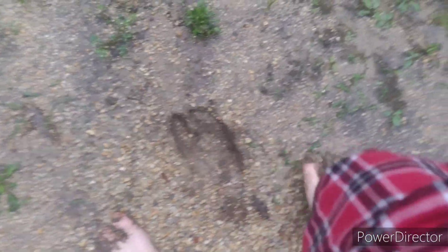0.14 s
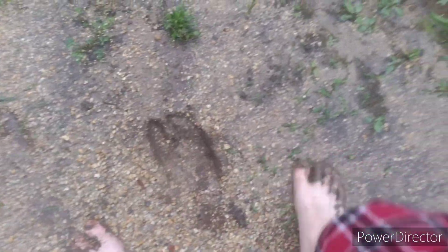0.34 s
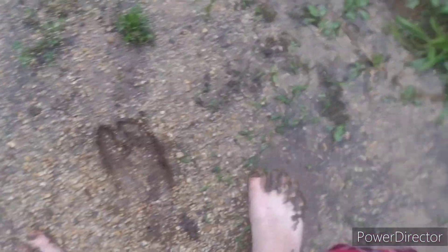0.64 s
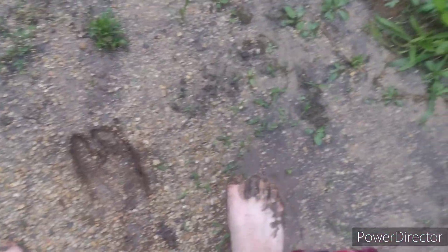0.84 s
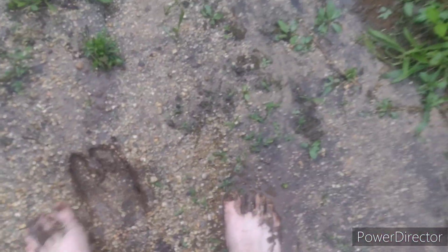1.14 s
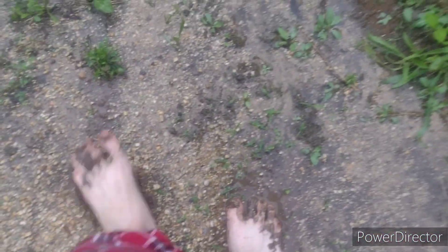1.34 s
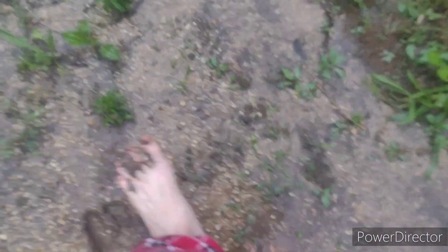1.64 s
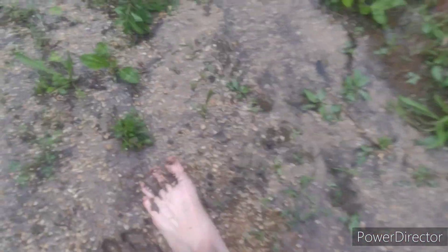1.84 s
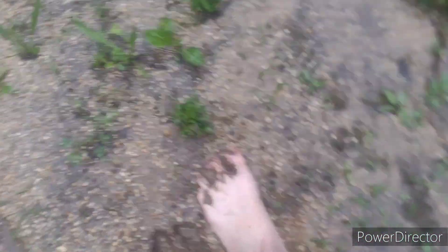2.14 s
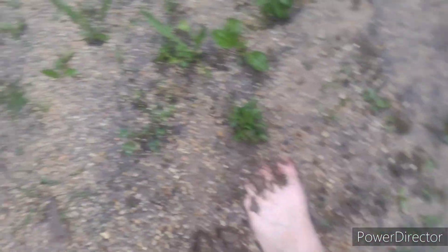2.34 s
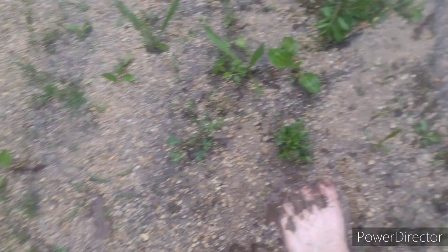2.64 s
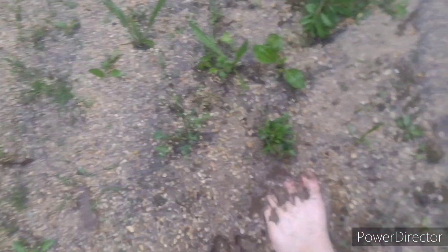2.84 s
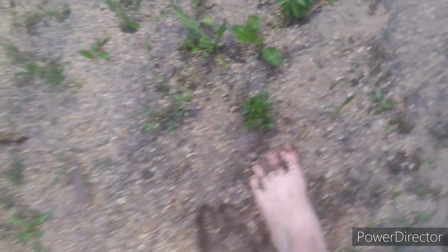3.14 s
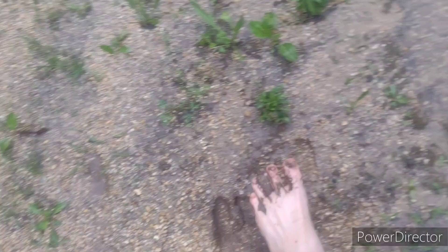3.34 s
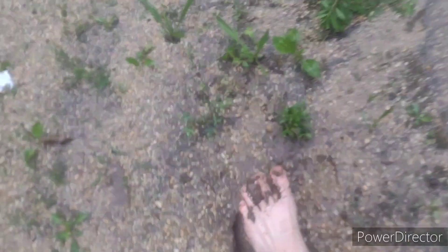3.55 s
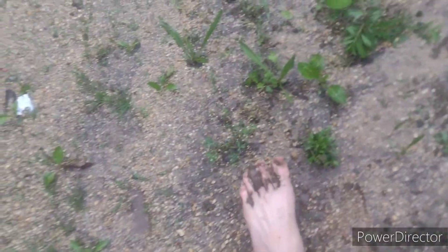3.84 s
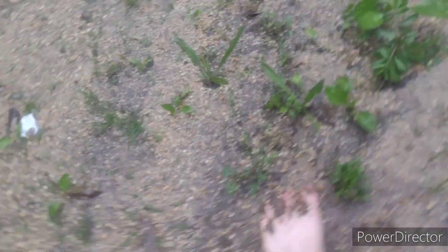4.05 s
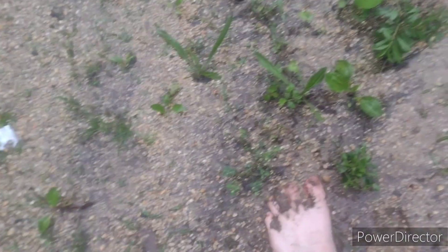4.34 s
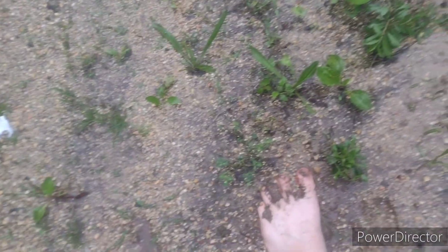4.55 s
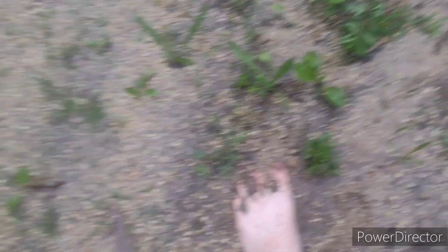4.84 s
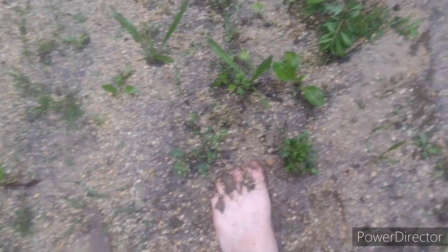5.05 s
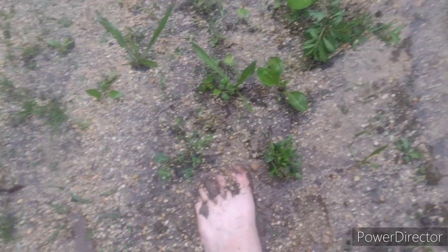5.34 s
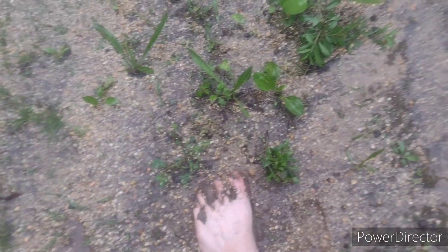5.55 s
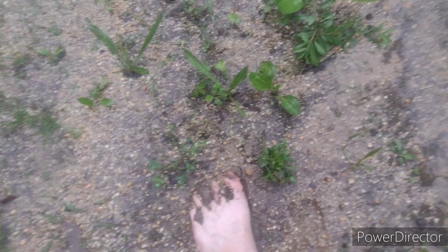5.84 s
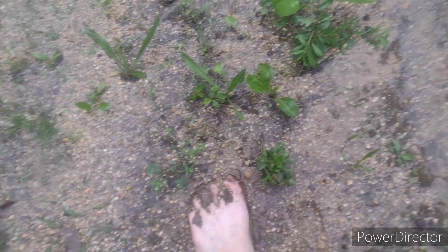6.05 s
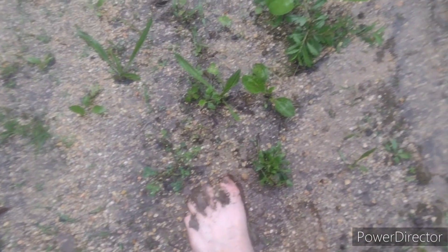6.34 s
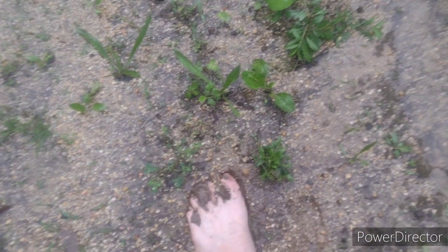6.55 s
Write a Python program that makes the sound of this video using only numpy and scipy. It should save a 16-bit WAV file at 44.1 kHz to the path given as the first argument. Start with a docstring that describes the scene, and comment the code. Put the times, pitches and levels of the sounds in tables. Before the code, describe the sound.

Slow bare footsteps on wet grit: hollow wet taps, crunchy cracks and tiny squelches in clusters, over a thin hiss of light rain.

```python
"""Barefoot on wet grit

Slow barefoot steps on wet, gritty ground in light rain, heard from a hand-held camera.
Short wet taps are swelling tones with noise bursts for crack and spray; squelches are tones alone.
A soft low rustle, crackle and scrape are coloured random impulses; rain is noise with patter, ticks are tiny
bursts. A faint drone of two wavering sines lies far off. The right microphone port is blocked: it gives only
a faint rumble, the rub of the grip and a little of the outside sound."""
import sys
import numpy as np
from scipy import signal
from scipy.fft import rfft, irfft, next_fast_len
from scipy.io import wavfile
from scipy.ndimage import map_coordinates

SR = 44100
rng = np.random.default_rng(int(sys.argv[2]) if len(sys.argv) > 2 else 0)


def pcm_store(signal):
    """Save signal as 16-bit PCM."""
    levels = np.round(np.clip(np.atleast_2d(signal), -1, 1) * 32767)
    wavfile.write(sys.argv[1], SR, levels.astype(np.int16).T)


N = 295533


def amp(db):
    """Decibels to a linear gain."""
    return 10 ** (np.asarray(db) / 20)


def unit(x):
    """x scaled to rms 1."""
    return x / np.sqrt(np.mean(x ** 2) + 1e-20)


def along(points, hz):
    """Read (Hz, value) points at any frequency, on a log frequency axis."""
    f, v = np.transpose(points)
    return np.interp(np.log(hz + 1), np.log(f + 1), v)


def wobble(rate):
    """A smooth random curve, rate knots a second."""
    knots = rng.standard_normal(int(N * rate / SR) + 4)
    return map_coordinates(knots, [np.arange(N) * rate / SR])


def filtered(x, response):
    """x times a response of frequency."""
    size = x.shape[-1]
    m = next_fast_len(2 * size)
    spectrum = rfft(x, m) * response(np.fft.rfftfreq(m, 1 / SR))
    return irfft(spectrum, m)[..., :size]


def coloured(x, spectrum):
    """x given a spectrum, at rms 1."""
    return unit(filtered(x, lambda hz: amp(along(spectrum, hz))))


def swell(t, rise):
    """Rises to 1 at t = rise, then dies away."""
    u = np.maximum(t, 0) / rise
    return u * np.exp(1 - u)


def plop(t, hz, rise):
    """A tone that swells and dies; its starting phase keeps it free of any net push."""
    phase = 2 * np.arctan(1 / (2 * np.pi * hz * rise))
    return np.sin(2 * np.pi * hz * t + phase) * swell(t, rise)


def burst(envelope, spectrum, snap=0):
    """A puff of coloured noise with the energy of its envelope; snap sets one sharp click at its crest."""
    puff = envelope * rng.standard_normal(len(envelope))
    puff[np.argmax(envelope)] += snap * np.linalg.norm(puff)
    return coloured(puff, spectrum) * np.sqrt(np.mean(envelope ** 2))


def grains(rate, spread_db):
    """Random impulses of varied size, about rate a second, at rms 1."""
    struck = rng.random(N) < rate / SR
    sizes = amp(spread_db * rng.standard_normal(N).clip(-2, 2))
    return unit(struck * rng.standard_normal(N) * sizes)


def add(track, s, sound):
    """Mix a sound into the track at time s."""
    start = max(round(s * SR), 0)
    track[start:start + len(sound)] += sound[:max(N - start, 0)]


def rain(level_db=-52, patter_db=-14):
    """Far drops merge into an even hiss; nearer ones patter on top of it."""
    # Spectrum of the rain. Each row: frequency in Hz, relative density in dB.
    rain_colour = [(25, -17), (50, -10), (85, 0), (200, 3.5), (330, 1), (700, -3), (1400, -0.5), (2200, 1),
                   (3200, -3), (4400, -3.5), (6000, -9.5), (7200, -10.5), (11000, -18), (15500, -23.5)]
    drops = rng.standard_normal(N) + amp(patter_db) * grains(rate=150, spread_db=4.5)
    return amp(level_db) * coloured(drops, rain_colour)


def hum(waver=0.59):
    """A faint, slightly unsteady drone from far off: sines with wandering phase (waver in radians)."""
    # Tones of the drone. Each row: frequency in Hz, rms level in dB.
    drone_tones = [(240.2, -62), (125, -69.5)]
    t = np.arange(N) / SR
    return sum(amp(db) * unit(np.sin(2 * np.pi * hz * t + waver * wobble(8.1))) for hz, db in drone_tones)


def rise_and_fade():
    """A gain shared by rustle, crackle, squelch and grip: each stretch builds quickly, holds and fades."""
    # Stretches where the soft rustle rises, holds and fades.
    # Each row: start of the hold in seconds, hold in seconds, gain in dB.
    stretches = [(0, 0.0046, -42), (1.29, 0.038, -52), (1.576, 0.062, -44.5), (1.897, 0.28, -49.5),
                 (3.577, 0.35, -48.5), (3.975, 0.4, -49.5), (5.636, .01, -56), (5.983, .01, -54),
                 (6.3, .1, -55), (6.536, 0.031, -54)]
    attack_s, release_s = 0.033, 0.063  # time constants
    t = np.arange(N) / SR
    gain = np.zeros(N)
    for s, hold, db in stretches:
        rising = np.maximum(s - t, 0) / attack_s
        fading = np.maximum(t - s - hold, 0) / release_s
        gain += amp(db) * np.exp(-rising - fading)
    return gain


def blocked_port(outside, floor_db=-74, grip_db=-16, lag_s=0.00044):
    """Little gets through, a shade later; the rub of the grip rises and fades along with the rustle."""
    # Spectrum of the steady rumble. Each row: frequency in Hz, relative density in dB.
    rumble_colour = [(25, -18), (60, -6.5), (110, 2.5), (250, -4), (600, -10.5), (1300, -16), (2700, -12.5),
                     (4000, -15), (8000, -22), (15000, -24)]
    # What leaks into the port from outside. Each row: frequency in Hz, gain in dB.
    leak_gain = [(60, -60), (300, -35), (900, -64), (2500, -64), (8000, -46), (15000, -28)]
    grip_colour = [(40, 11), (130, 1.0), (700, -11.5), (2800, -20), (4000, -21), (15000, -49)]
    rumble = amp(floor_db) * coloured(rng.standard_normal(N), rumble_colour)
    rub = coloured(grains(rate=1800, spread_db=14.0), grip_colour)
    grip = rise_and_fade() * amp(grip_db) * rub
    leak = filtered(outside, lambda hz: amp(along(leak_gain, hz)) * np.exp(-2j * np.pi * hz * lag_s))
    return rumble + grip + leak


def rustle(level_db=-1.5, unevenness_db=2):
    """A soft low rustle of dense random impulses swells and fades, its level uneven."""
    # Spectrum of the rustle. Each row: frequency in Hz, relative density in dB.
    rustle_colour = [(40, -41), (100, 9), (270, 9.5), (550, -6.5), (1100, -2.5), (2900, -4.5), (3250, -12),
                     (5000, -18.5), (8000, -25.5), (15000, -34)]
    uneven = amp(level_db + unevenness_db * wobble(70))
    return rise_and_fade() * uneven * coloured(grains(rate=4000, spread_db=0.5), rustle_colour)


def crackle(level_db=-8, rate=140, spread_db=3):
    """Sparse single impulses crackle through the rustle."""
    # Spectrum of the crackle. Each row: frequency in Hz, relative density in dB.
    crackle_colour = [(100, -14), (600, -2), (1500, -2.5), (2900, -2.5), (4000, -13), (8000, -21),
                      (15000, -24)]
    return rise_and_fade() * amp(level_db) * coloured(grains(rate, spread_db), crackle_colour)


def squelch(level_db=-2, rate=60, low_hz=220, high_hz=1100, cycles=0.53, spread_db=4):
    """Tiny plops at random pitches, rate a second, louder where the rustle is louder."""
    out, t, loudness = np.zeros(N), np.arange(SR // 40) / SR, rise_and_fade()
    for when, pitch, size in rng.random((int(rate * N / SR), 3)):
        hz = low_hz * (high_hz / low_hz) ** pitch
        gain = loudness[int(when * N)] * amp(level_db + 2 * spread_db * size ** 2)
        add(out, when * N / SR, gain * plop(t, hz, cycles / hz))
    return out


def wet_tap(thud, pop, crack, spray_db, cycles=0.38, contact_s=0.00013, snap=0.32,
            crack_rise_s=0.0005, spray_rise_s=0.000428, spray_lead_s=0.00061,
            settle_db=-21, settle_rise_s=0.0083, heavy_hz=140, heavy_power=0.83,
            linger_db=-16, linger=3.8, sag=0.822, grit_db=-20, grit_rise_s=0.0025):
    """A dull thud, a hollow pop, a gritty crack (each Hz, dB) and a fine spray: (delay s, sound) parts."""
    # A crack around its own pitch. Each row: multiple of the pitch, relative density in dB.
    crack_shape = [(.1, -8), (.35, -10), (.75, -6), (1, -2.5), (1.3, -3), (2.5, -22), (6, -44)]
    # Spectrum of the fine spray. Each row: frequency in Hz, relative density in dB.
    spray_colour = [(2000, -16), (4500, -9), (7500, 0), (10000, -15.5), (15000, -2)]
    # Spectrum of the low shudder after a tap. Each row: frequency in Hz, relative density in dB.
    shudder_colour = [(40, -40), (105, 1), (350, 5), (900, -9.5), (3000, -38), (9000, -60)]
    (thud_hz, thud_db), (pop_hz, pop_db), (crack_hz, crack_db) = thud, pop, crack
    t = np.arange(SR // 10) / SR

    def ring(hz):
        return plop(t, hz, contact_s + cycles / hz)

    def gritty(rise):
        # a fainter, slower tail follows the first snap
        return swell(t, rise) + amp(grit_db) * swell(t, grit_rise_s)

    body = amp(thud_db) * ring(thud_hz) + amp(pop_db) * ring(pop_hz)
    # the thud lingers faintly at a lower pitch
    body += amp(thud_db + linger_db) * plop(t, sag * thud_hz, linger * cycles / thud_hz)
    crack_colour = [(crack_hz * multiple, db) for multiple, db in crack_shape]
    grit = amp(crack_db) * burst(gritty(crack_rise_s), crack_colour, snap)
    # the deeper the thud, the more low shudder it leaves behind
    depth = (heavy_hz / thud_hz) ** heavy_power
    shudder = amp(thud_db + settle_db) * depth * burst(swell(t, settle_rise_s), shudder_colour)
    spray = amp(spray_db) * burst(gritty(spray_rise_s), spray_colour, snap)
    # the spray starts just before the rest
    return [(0, body + grit + shudder), (-spray_lead_s, spray)]


def taps(faint_spray_db=-68):
    """Taps mix thud, pop, crack and spray in varied shares."""
    # Short wet taps close to the microphone. Each row: start in seconds, thud pitch in Hz, thud level in dB,
    # pop pitch in Hz, pop level in dB, crack pitch in Hz, crack level in dB.
    full_taps = [(0.3643, 258, -33.5, 885, -33.5, 1200, -42.5), (1.2514, 411, -18, 635, -22, 2380, -26),
                 (1.6024, 345, -19, 790, -13, 1730, -27.5), (2.778, 313, -25.5, 574, -32, 3240, -33.5),
                 (3.5683, 330, -24, 824, -13.5, 2550, -14), (3.7737, 468, -13, 770, -9, 1800, -14),
                 (4.1877, 320, -17.5, 670, -14, 2820, -16), (6.351, 473, -29, 660, -25, 990, -38.5),
                 (6.507, 470, -20.5, 660, -30, 2870, -33), (6.5395, 320, -31.5, 450, -40, 1030, -30.5),
                 (6.609, 387, -31, 537, -33.5, 2200, -52)]
    # Taps that share one pop pitch and one crack pitch.
    # Each row: start in seconds, thud pitch in Hz, thud level in dB, pop level in dB.
    soft_taps = [(0.2619, 230, -40, -44), (1.544, 143, -29, -27), (1.5727, 246, -17, -20.5),
                 (1.5797, 189, -26, -30), (1.6132, 267, -40, -36), (1.9027, 213, -23, -25),
                 (1.9571, 270, -23, -21), (2.0729, 174, -29, -28.5), (2.1711, 120, -34, -44),
                 (2.236, 186, -44, -37.5), (2.6538, 250, -42, -37.5), (3.5717, 122, -27, -28),
                 (3.693, 264, -31, -45), (3.7082, 254, -26, -35), (3.7859, 150, -23.5, -16.5),
                 (3.852, 129, -26, -27.5), (3.8883, 127, -29.5, -33), (3.9362, 119, -30, -34.5),
                 (3.9819, 133, -40, -32), (4.0006, 118, -31.5, -44), (4.155, 300, -27.5, -52),
                 (4.3063, 130, -16.5, -17.5), (5.5509, 168, -31, -52), (5.6247, 228, -30.5, -49)]
    # Taps whose thud follows from their pop.
    # Each row: start in seconds, pop pitch in Hz, pop level in dB, crack pitch in Hz, crack level in dB.
    pop_taps = [(0.1041, 1760, -22, 2680, -34), (1.3118, 734, -33.5, 1100, -37.5),
                (1.335, 850, -39, 1500, -43), (1.5263, 810, -17, 2600, -22.5),
                (1.8072, 910, -32.5, 3640, -28), (2.0378, 1010, -22, 1330, -28.5),
                (2.1423, 1020, -25, 2940, -33.5), (2.4214, 2170, -24, 2100, -21),
                (3.3745, 2100, -43, 2230, -35.5), (3.546, 990, -30, 1500, -43),
                (3.6748, 960, -28, 2500, -41), (5.9863, 774, -20, 2780, -23)]
    full_spray_db = -15  # relative to the crack
    soft_pop_hz, soft_crack_hz = 449, 2150
    soft_crack_db, soft_spray_db = -10, -25  # relative to the louder of thud and pop
    thud_ratio, thud_below_db = 0.242, -15.5  # pitch and level of the thud relative to the pop

    contacts = []
    for s, thud_hz, thud_db, pop_hz, pop_db, crack_hz, crack_db in full_taps:
        contacts.append((s, (thud_hz, thud_db), (pop_hz, pop_db), (crack_hz, crack_db),
                         crack_db + full_spray_db))
    for s, thud_hz, thud_db, pop_db in soft_taps:
        force_db = max(thud_db, pop_db)
        contacts.append((s, (thud_hz, thud_db), (soft_pop_hz, pop_db),
                         (soft_crack_hz, force_db + soft_crack_db), force_db + soft_spray_db))
    for s, pop_hz, pop_db, crack_hz, crack_db in pop_taps:
        thud = (thud_ratio * pop_hz, pop_db + thud_below_db)
        contacts.append((s, thud, (pop_hz, pop_db), (crack_hz, crack_db), faint_spray_db))

    out = np.zeros(N)
    for s, *parts in contacts:
        for delay, sound in wet_tap(*parts):
            add(out, s + delay, sound)
    return out


def hollow(x, turn_hz=800):
    """The cupped hand colours a tap and lets its low part arrive just after the bright part."""
    # The hollow between hand and camera. Each row: frequency in Hz, gain in dB.
    hollow_gain = [(400, -0.5), (580, 1.5), (780, -3), (1000, 2.5), (1250, -0.5), (1550, 1.5), (1950, -3.5),
                   (2600, -1), (3700, -6), (5300, 0), (6600, -4.5), (9000, -3.5)]
    # the fraction is an all-pass: it delays the lows and leaves levels alone
    return filtered(x, lambda hz: amp(along(hollow_gain, hz)) * (turn_hz - 1j * hz) / (turn_hz + 1j * hz))


def ticks(rise_s=0.00043, skirt_db=-17, stray_db=-54, stray_hz=9000, count=8):
    """Tiny bright clicks, each around its own pitch; fainter ones fall at random."""
    # Tiny drops and grit ticks. Each row: crest of the tick in seconds, level in dB, pitch in Hz.
    tick_list = [(.554, -42.5, 8900), (.786, -48, 11000), (1.5663, -30.5, 4060), (1.5802, -26.5, 3900),
                 (1.638, -40, 3700), (1.673, -43.5, 6800), (1.872, -37.5, 6100), (2.296, -44, 8350),
                 (2.422, -37, 6200), (3.161, -49, 13000), (3.206, -43, 6500), (3.9805, -46, 12000),
                 (4.106, -45, 8000), (4.279, -41, 8750), (5.111, -48.5, 6360)]
    out, t = np.zeros(N), np.arange(SR // 50) / SR
    # strays scatter half an octave either way
    strays = [(when * N / SR, stray_db, stray_hz * 2 ** (pitch - .5)) for when, pitch in rng.random((count, 2))]
    for s, db, hz in tick_list + strays:
        colour = [(hz / 10, 2 * skirt_db), (hz / 2, skirt_db), (hz, 0), (2 * hz, skirt_db), (4 * hz, 2 * skirt_db)]
        add(out, s - rise_s, amp(db) * burst(swell(t, rise_s), colour))
    return out


def scuffs():
    """A short drag sets off a dense run of grains."""
    # Toes dragging through grit. Each row: start in seconds, length in seconds, level in dB.
    drags = [(4.128, .04, -36.5)]
    # Spectrum of the drag. Each row: frequency in Hz, relative density in dB.
    scuff_colour = [(100, 1.5), (450, 1), (900, -6), (2500, -8), (3600, -11), (5500, -7), (8000, -14),
                    (11000, -24), (15000, -28)]
    envelope, t = np.zeros(N), np.arange(N) / SR
    for s, length, db in drags:
        progress = np.clip((t - s) / length, 0, 1)
        envelope += amp(db) * np.sqrt(np.abs(np.sin(np.pi * progress)))
    return envelope * coloured(grains(rate=18000, spread_db=1.0), scuff_colour)


def scene():
    """Left: the open port with every outside source; right: the blocked port."""
    ground = rustle() + crackle() + squelch() + scuffs()
    outside = rain() + hum() + ground + hollow(taps()) + ticks()
    return np.array([outside, blocked_port(outside)])


def record(dry, low_hz=55, top_hz=15750):
    """The camera cuts the deep bass, dips in the upper mids and keeps nothing above its band limit."""
    # The dip of the microphone ducts. Each row: frequency in Hz, gain in dB.
    duct_gain = [(2900, 1), (3350, -2.5), (3900, -2.5), (4600, 0)]
    thin = signal.sosfilt(signal.butter(3, low_hz, "high", fs=SR, output="sos"), dry)
    return filtered(thin, lambda hz: amp(along(duct_gain, hz)) * (hz < top_hz))


dry = scene()
out = record(dry)
pcm_store(out)
```